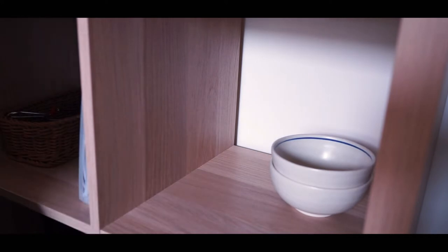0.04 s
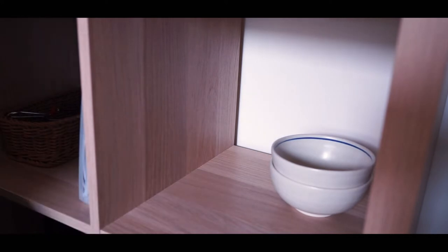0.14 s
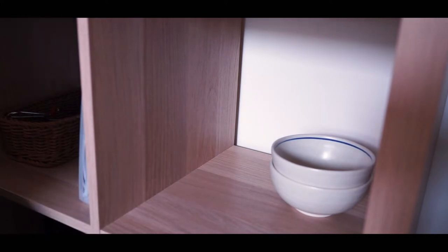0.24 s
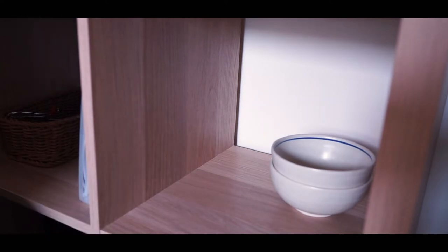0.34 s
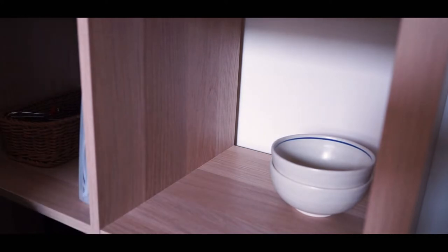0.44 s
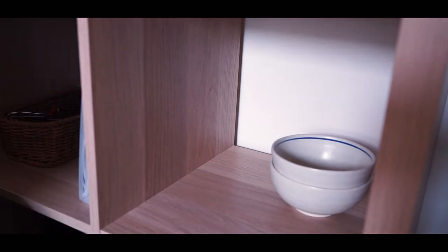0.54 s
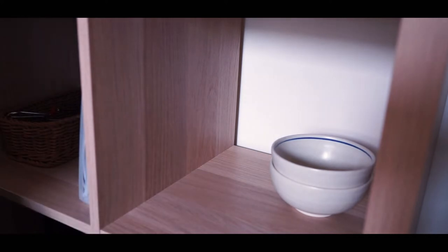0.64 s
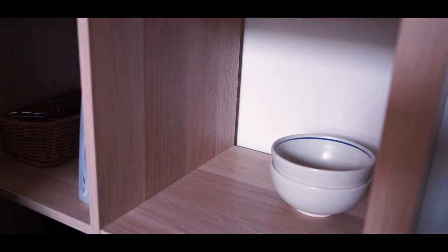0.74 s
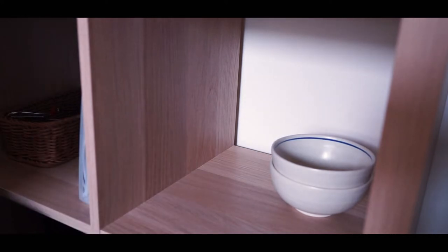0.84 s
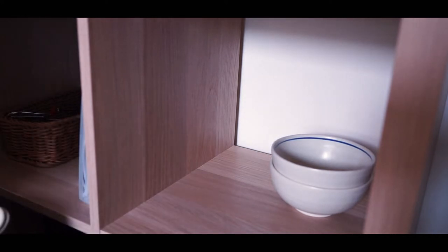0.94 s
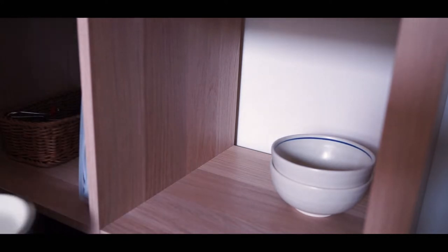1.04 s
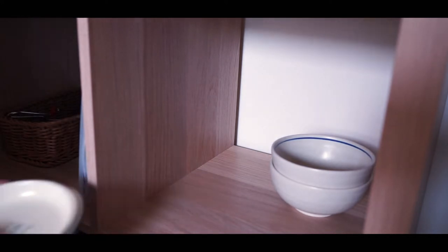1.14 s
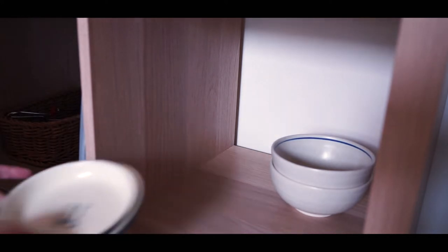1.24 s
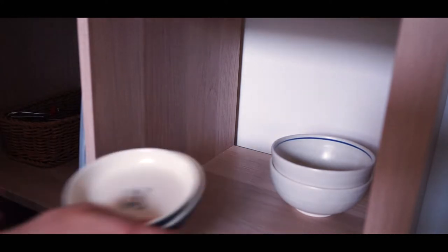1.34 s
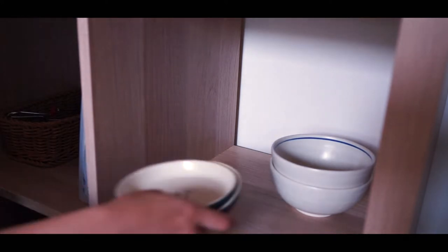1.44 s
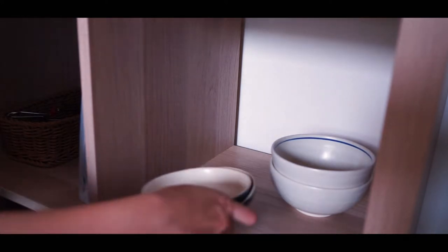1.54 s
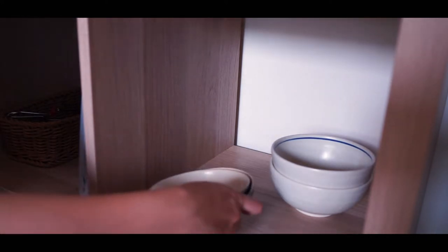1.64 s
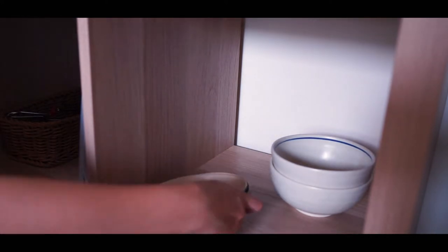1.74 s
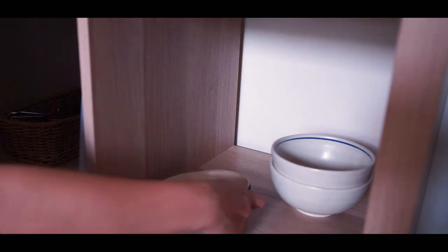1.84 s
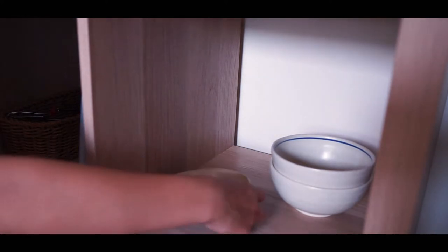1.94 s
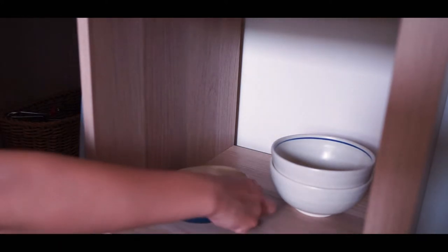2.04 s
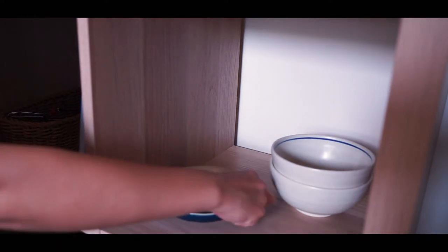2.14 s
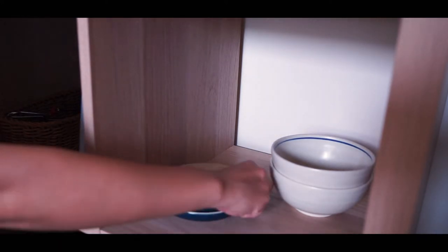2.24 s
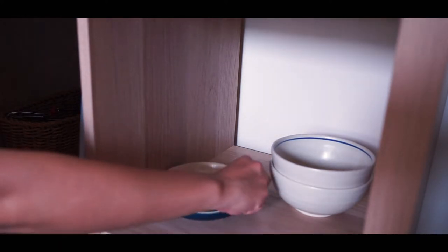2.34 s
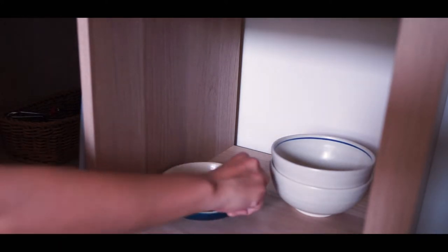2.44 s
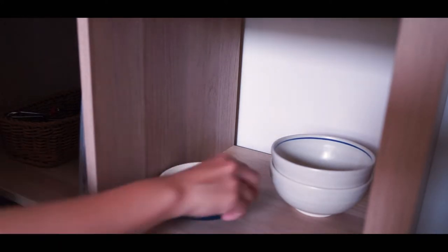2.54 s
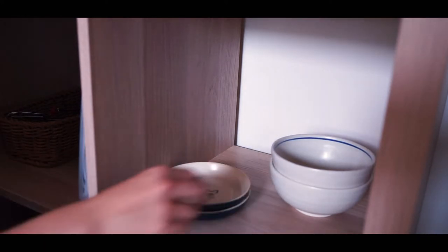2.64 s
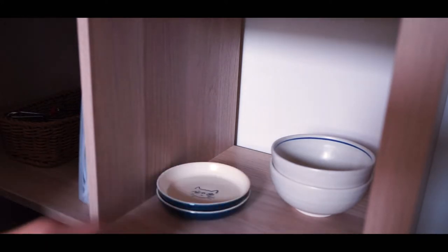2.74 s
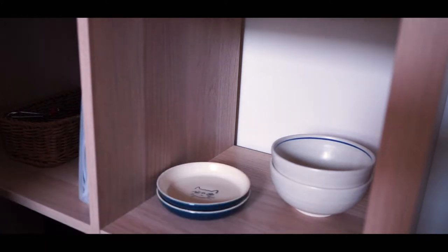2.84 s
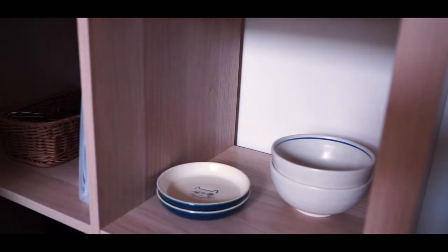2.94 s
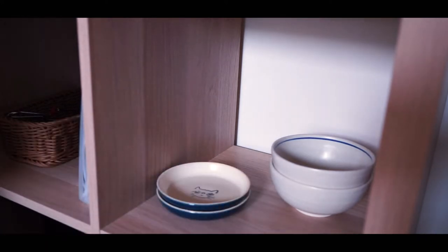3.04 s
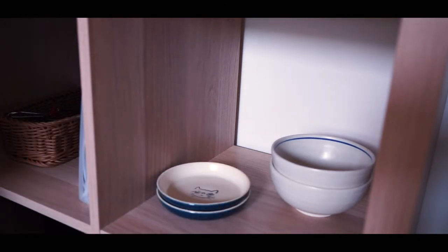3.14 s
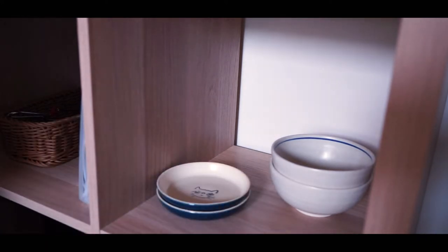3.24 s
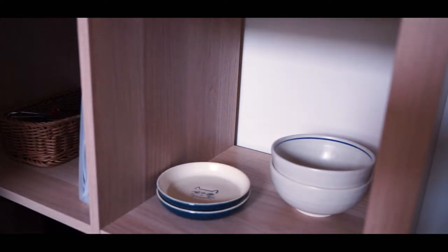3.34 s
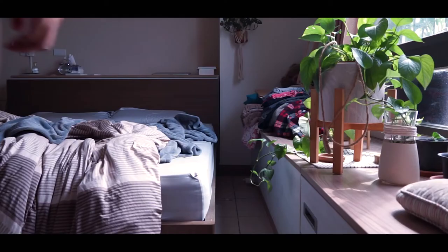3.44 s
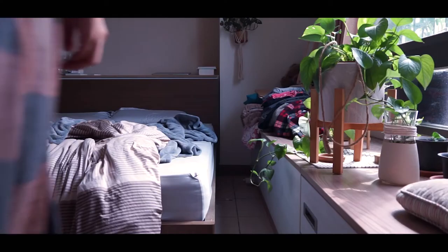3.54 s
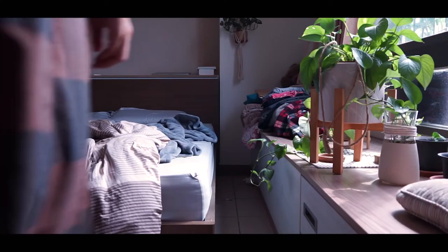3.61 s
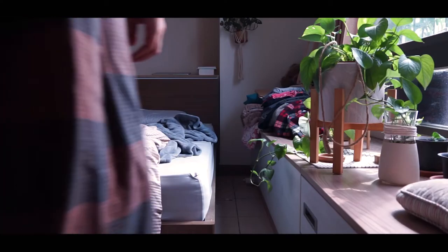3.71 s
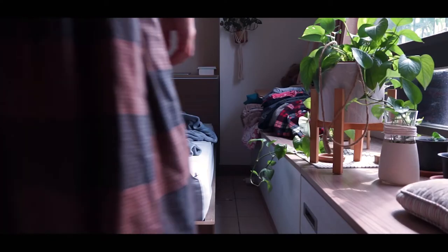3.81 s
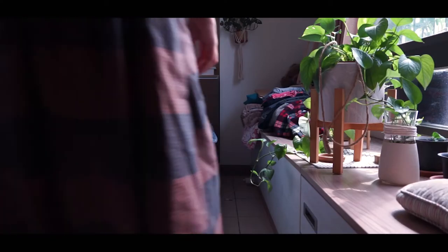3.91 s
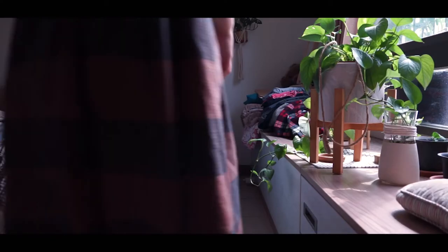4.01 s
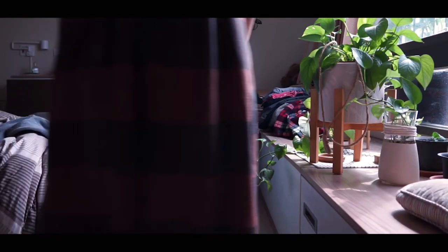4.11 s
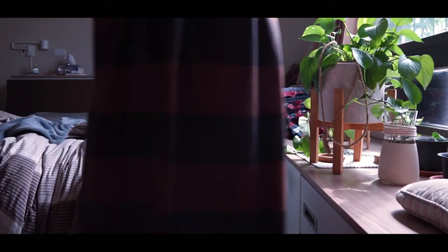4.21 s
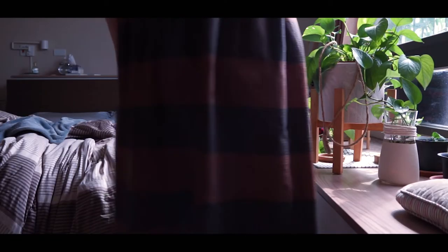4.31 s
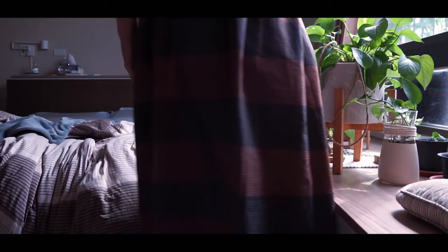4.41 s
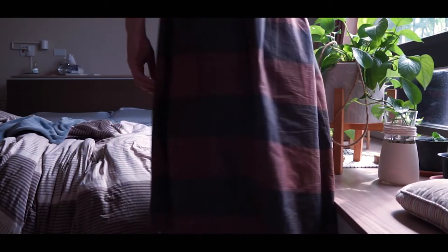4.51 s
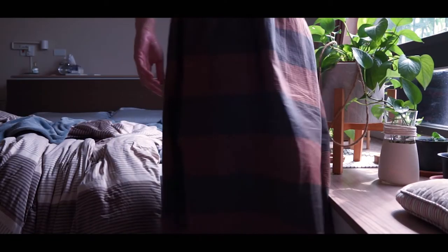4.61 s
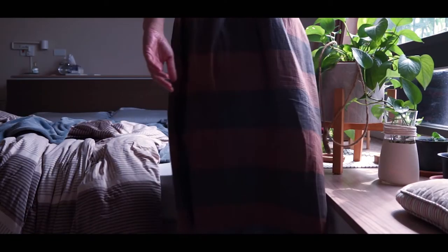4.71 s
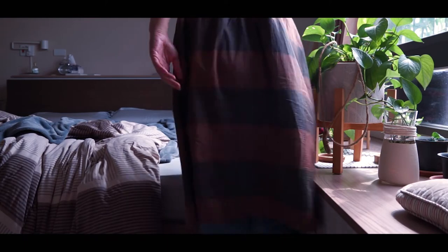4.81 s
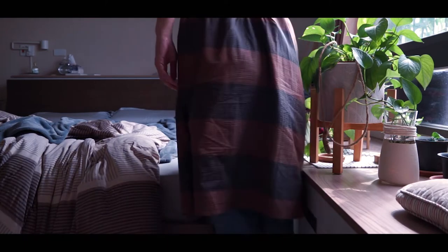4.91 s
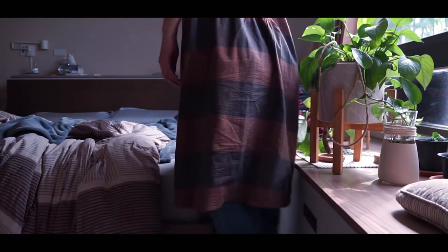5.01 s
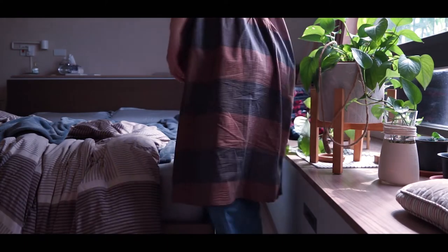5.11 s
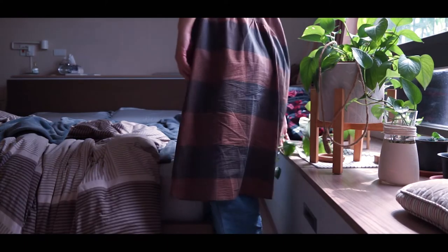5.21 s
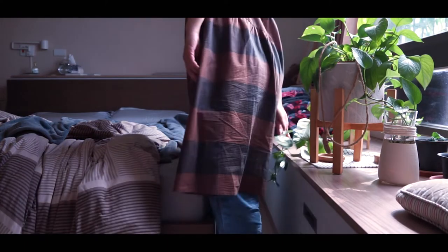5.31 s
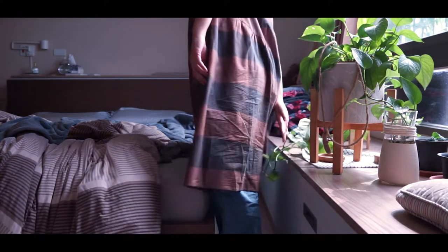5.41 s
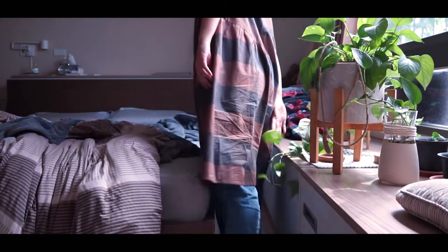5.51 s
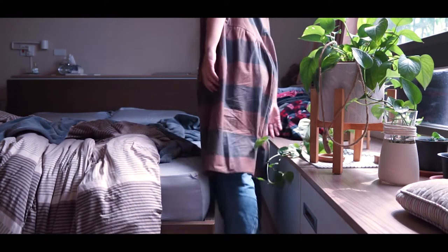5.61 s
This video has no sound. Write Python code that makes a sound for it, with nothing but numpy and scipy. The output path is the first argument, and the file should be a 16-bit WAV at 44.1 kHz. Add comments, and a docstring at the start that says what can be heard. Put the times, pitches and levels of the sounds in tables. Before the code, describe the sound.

In a quiet room, close to the microphone, stacked china plates scrape and knock against each other and on wood, ringing briefly. They land on a wooden shelf and rock flat in sharp, damped clacks, the loudest sounds here. The rest is much quieter: a short swish of fabric, a couple of soft footfalls and the light rustle of a dress, with a distant bird's falling whistles over a low hum of air.

```python
"""China clinks and scrapes: two small plates are slid and knocked off a wooden board to the left, carried
over and set down in a wooden shelf, where they rock and clack. Each blow rings the modes of plates and
wood; each slide is a stream of tiny slips. Then clothing swishes in strokes of noise as someone walks
through the quiet room, while a bird whistles far outside."""
import sys
import numpy as np
from scipy import signal
from scipy.fft import rfft, irfft, next_fast_len
from scipy.io import wavfile
from scipy.ndimage import uniform_filter1d, minimum_filter1d

SR = 44100
rng = np.random.default_rng(int(sys.argv[2]) if len(sys.argv) > 2 else 0)


def master_out(mix):
    """Clip the mix to full scale and print it as 16-bit PCM to the path in sys.argv[1]."""
    frames = np.transpose(np.atleast_2d(mix))
    ceiling = np.clip(frames, -1, 1)
    pcm = np.round(ceiling * 32767).astype(np.int16)
    wavfile.write(sys.argv[1], SR, pcm)


N = 249595
HIT_SIZE = 32768  # samples in one blow or room response
TIME, HIT_TIME = np.arange(N) / SR, np.arange(HIT_SIZE) / SR
HIT_HZ = np.fft.rfftfreq(HIT_SIZE, 1 / SR)


def amp(db):
    """Decibels to gain."""
    return 10 ** (np.asarray(db) / 20)


def unit_rms(x):
    """Scales to rms 1."""
    return x / np.sqrt(np.mean(x ** 2) + 1e-20)


def unit_energy(x):
    """Scales to an average energy of 1 per channel."""
    return unit_rms(x) / np.sqrt(x.shape[-1])


def curve_at(points, hz):
    """Reads a curve on a log-frequency axis."""
    point_hz, value = np.transpose(points)
    return np.interp(np.log(hz + 1), np.log(point_hz + 1), value)


def add(mix, start_s, sound):
    """Mixes a sound in at start_s."""
    part = mix[:, max(round(start_s * SR), 0):][:, :sound.shape[-1]]
    part += sound[..., :part.shape[-1]]


def strokes(table, attack_s, fade_db_per_s):
    """Envelope of rubbing strokes: each swells, holds and dies away."""
    start_s, length_s, level_db = np.transpose(table)[:, :, None]
    fade_db = np.clip(fade_db_per_s * (TIME - start_s - length_s), 0, 120)
    gains = np.clip((TIME - start_s) / attack_s, 0, 1) * amp(level_db - fade_db)
    return np.linalg.norm(gains, axis=0)


def flutter(depth_db, samples):
    """A gain that wavers at random, smoothed over so many samples."""
    return amp(depth_db * unit_rms(uniform_filter1d(rng.standard_normal(N), size=samples)))


# Left-right likeness of diffuse sound: freq_hz, correlation
STEREO_LIKENESS = [(60, 0.97), (290, 0.96), (640, 0.84), (1410, 0.69), (3100, 0.0033), (7000, 0.027)]
def noise(size, colour=((1, 0), (2, 0))):
    """Diffuse stereo noise, white by default: alike in the bass, unrelated in the treble."""
    n = next_fast_len(size)
    hz = np.fft.rfftfreq(n, 1 / SR)
    left, unrelated = rfft(rng.standard_normal((2, n)))
    likeness = curve_at(STEREO_LIKENESS, hz)
    right = likeness * left + np.sqrt(1 - likeness ** 2) * unrelated
    return unit_rms(irfft(np.array([left, right]) * amp(curve_at(colour, hz)), n)[:, :size])


def noise_band(hz, width_hz):
    """Noise that follows a pitch curve; a narrow band whistles."""
    pole = np.exp(-np.pi * width_hz / SR)
    band = signal.lfilter([1], np.poly([pole, pole]), noise(len(hz)) + 1j * noise(len(hz)))
    return unit_rms((band * np.exp(2j * np.pi * np.cumsum(hz) / SR)).real)


def click(colour):
    """The shortest click with this spectrum (minimum phase)."""
    cepstrum = irfft(np.log(amp(curve_at(colour, HIT_HZ))))
    cepstrum[1:HIT_SIZE // 2] *= 2
    cepstrum[HIT_SIZE // 2 + 1:] = 0
    return unit_energy(irfft(np.exp(rfft(cepstrum))))


def ring(modes, damping, split=0.0063):
    """One spectrum per mode, a beating pair as no plate is quite round; damping divides base_t60_s."""
    hz, energy_db, base_t60_s = np.transpose(modes)[:, :, None]
    phase = 2 * np.pi * hz * HIT_TIME
    twin = 0.45 * np.sin(phase * (1 + split) + 1) * (1 - np.exp(-phase / 20))
    waves = (np.sin(phase * (1 - split / 2)) - twin) * 1000 ** (-HIT_TIME * damping / base_t60_s)
    gains = amp(energy_db)
    waves *= gains / np.linalg.norm(waves, axis=1, keepdims=True) / np.linalg.norm(gains)
    delay_s = rng.uniform(0, 0.001937, hz.shape)  # bending waves need a moment to cross the plate
    return rfft(waves) * np.exp(-2j * np.pi * HIT_HZ * delay_s)


# Decay of the room tail: freq_hz, t60_s
ROOM_DECAY = [(150, 0.66), (400, 0.44), (1040, 0.47), (2760, 0.48), (7280, 0.41)]
# Tone of the room tail: freq_hz, level_db
ROOM_COLOUR = [(100, 11), (250, 6.5), (600, 4), (1200, 4), (3000, 0), (8000, 10), (16000, 10)]
def room(x, wet_db, near_db, near_t60_s):
    """Quick reflections between nearby panels, then the tail of a furnished room."""
    hz, t, bands = signal.stft(noise(HIT_SIZE, ROOM_COLOUR), SR, nperseg=256)
    decay = 1000 ** (-t / curve_at(ROOM_DECAY, hz)[:, None])
    tail = signal.istft(bands * decay, SR, nperseg=256)[1][:, :HIT_SIZE]
    tail = unit_energy(tail * np.clip((HIT_TIME - 0.004) / 0.0069, 0, 1))
    near = unit_energy(noise(HIT_SIZE) * 1000 ** (-HIT_TIME / near_t60_s) * (HIT_TIME > 0.002))
    return x + signal.fftconvolve(x, amp(wet_db) * tail + amp(near_db) * near, axes=1)[:, :N]


# Still air, before and after the change: freq_hz, density_db
EARLY_AIR = [(15, -48), (25, -28), (82, 0), (130, -11.5), (277, -1), (317, -9.5), (373, -4.5), (607, -8),
             (1040, -11), (1700, -13.5), (2280, -13), (2990, -18), (9840, -30.5), (10700, -28.5),
             (16000, -32.5)]
LATE_AIR = [(15, -61), (25, -32), (105, -3.5), (185, -11.5), (229, -2), (326, -13), (354, -12),
            (463, -10.5), (503, -11.5), (796, -13.5), (1940, -19), (2160, -19.5), (2410, -20.5),
            (3720, -24), (16000, -36.5)]
def room_tone(shelf_db=-50, window_db=-50.5, change_s=3.48, crossfade_s=0.014):
    """A low bed of air whose colour changes quickly at change_s."""
    blend = np.clip((TIME - change_s) / crossfade_s, 0, 1)
    return (np.sqrt(1 - blend) * amp(shelf_db) * noise(N, EARLY_AIR)
            + np.sqrt(blend) * amp(window_db) * noise(N, LATE_AIR))


# Calls: start_s, length_s, first_hz, last_hz, level_db, width_hz, bend (1 is straight, more flattens out)
BIRD_CALLS = [(2.425, 0.16, 3050, 2245, -50, 110, 1.8), (2.598, 0.2, 2274, 2250, -63, 81, 1.9),
              (2.971, 0.16, 2924, 2186, -52.5, 120, 1.77), (3.95, 0.29, 2173, 2180, -64.5, 30, 1.9),
              (4.435, 0.21, 3210, 1607, -53, 480, 1.4), (4.90, .12, 2650, 1700, -58, 380, 1.1),
              (5.16, 0.22, 3102, 1645, -54, 623, 0.99), (5.55, .12, 2516, 1660, -57, 450, 1.2)]
def bird():
    """Whistles, most of them falling, blurred by distance."""
    out = np.zeros((2, N))
    for start_s, length_s, first_hz, last_hz, level_db, width_hz, bend in BIRD_CALLS:
        progress = np.linspace(0, 1, round(length_s * SR))
        pitch_hz = last_hz + (first_hz - last_hz) * (1 - progress) ** bend
        add(out, start_s, amp(level_db) * np.sin(np.pi * progress) * noise_band(pitch_hz, width_hz))
    return room(out, wet_db=13, near_db=-27, near_t60_s=0.048)


# A close swish, and folds of a dress swinging with the strides: start_s, length_s, level_db
SWISH_STROKES = [(3.22, 0.257, -37), (3.265, 0.102, -37.5)]
RUSTLE_STROKES = [(3.50, .04, -57), (3.61, 0.067, -55.5), (4.19, 0.031, -55), (4.39, 0.14, -58.5),
                  (4.745, 0.17, -51), (4.98, 0.037, -55), (5.20, 0.13, -53), (5.47, 0.055, -54)]
# Tone of each: freq_hz, density_db
SWISH_COLOUR = [(120, -36), (200, -15), (259, -13), (366, -17), (409, -27), (491, -2.5), (709, -20),
                (1160, -4), (4430, -4), (8420, 0.5), (16000, -0.5)]
RUSTLE_COLOUR = [(300, -30), (1200, 0), (3000, -1), (5000, -0.5), (9000, -2), (16000, -6)]
# Soft arm brushes and bare steps: start_s, length_s, level_db, centre_hz, width_hz
BRUSHES_AND_STEPS = [(2.873, 0.15, -51, 2420, 2160), (3.134, 0.16, -50, 2490, 2200),
                     (3.326, 0.045, -48.5, 351, 202), (3.447, 0.035, -44, 290, 200),
                     (5.479, 0.12, -50, 2284, 1800)]
def walker(swish_left_db=0.5, rustle_db=-1):
    """Fabric rubs in grainy strokes of noise over a few soft brushes and footfalls."""
    swish = strokes(SWISH_STROKES, attack_s=0.052, fade_db_per_s=2500) * noise(N, SWISH_COLOUR)
    rustle = strokes(RUSTLE_STROKES, attack_s=0.036, fade_db_per_s=59) * noise(N, RUSTLE_COLOUR)
    out = swish * amp([[swish_left_db], [-swish_left_db]]) + amp(rustle_db) * rustle
    for start_s, length_s, level_db, centre_hz, width_hz in BRUSHES_AND_STEPS:
        swell = np.hanning(round(length_s * SR))
        add(out, start_s, amp(level_db) * swell * noise_band(np.full(len(swell), centre_hz), width_hz))
    return out * flutter(depth_db=1, samples=150)


# Swells of a high ring: start_s, length_s, level_db
SINGING_STROKES = [(1.045, 0.034, -48), (1.24, 0.16, -52.5)]
def singing(gain_db=-6, first_hz=10530, rise_hz_per_s=550):
    """A thin ring creeps upward while the plates are carried."""
    envelope = strokes(SINGING_STROKES, attack_s=0.03, fade_db_per_s=105)
    pitch_hz = first_hz + rise_hz_per_s * (TIME - SINGING_STROKES[0][0])
    return amp(gain_db) * envelope * noise_band(pitch_hz, width_hz=140)


# A sticking plate: start_s, length_s, level_db, pitch_hz
SQUEAKS = [(0.386, .06, -33.5, 1552)]
def squeak(width_hz=70):
    """The glaze catches, sings for a moment and lets go."""
    out = np.zeros((2, N))
    for start_s, length_s, level_db, pitch_hz in SQUEAKS:
        swell = np.sin(np.pi * np.sqrt(np.linspace(0, 1, round(length_s * SR))))
        add(out, start_s, amp(level_db) * swell * noise_band(np.full(len(swell), pitch_hz), width_hz))
    return room(out, wet_db=-7, near_db=-10, near_t60_s=0.03)


def slips(per_s, spread_db, max_db):
    """Stick-slip friction: random impulses, a few of them much stronger."""
    fired = rng.random(N) < per_s / SR
    return fired * amp(np.minimum(spread_db * rng.exponential(1, N), max_db))


# Pushes on the stack: start_s, length_s, glaze_db, wood_db
PUSHES = [(-0.03, .09, -47.5, -39.5), (.06, 0.054, -42, -50), (.345, 0.17, -42.5, -44),
          (.655, 0.039, -47, -53), (.682, 0.022, -44, -36), (.72, 0.068, -40.5, -53),
          (.897, .055, -46.5, -41), (1.025, 0.09, -56, -52), (1.31, 0.022, -58, -43),
          (1.65, 0.033, -55, -39.5)]
def push_envelope(on_wood):
    """How hard the pushes rub the wood, or else the glaze."""
    rows = np.array(PUSHES)[:, [0, 1, 3 if on_wood else 2]]
    return strokes(rows, attack_s=0.012, fade_db_per_s=233)


# Modes of the board: pitch_hz, energy_db, base_t60_s
BOARD_MODES = [(649, -9, 0.36), (672, -8, 0.36), (768, -10, 0.22), (809, -3, 0.24), (849, 0, 0.24),
               (942, -3, 0.26), (1034, -13, 0.37), (1061, -9, 0.36), (1148, -13, 0.27), (1280, -9, 0.24),
               (1318, -13, 0.25), (1462, -14, 0.23), (1493, -14, 0.27)]
# Its body, the crowded, quickly dying modes in between: freq_hz, density_db
BOARD_BODY = [(100, -63), (270, -31.5), (410, -2), (540, -2), (880, 10.5), (1500, -17), (3000, -9.5),
              (8000, -11), (16000, -14.5)]
def wood_drag(body_db=-4, ring_db=-4, band_hz=(280, 2800)):
    """The foot ring sticks and slips on the wood, which answers with a low rasp."""
    drive = unit_rms(slips(per_s=400, spread_db=3, max_db=9)) * push_envelope(on_wood=True)
    tones = irfft(ring(BOARD_MODES, damping=4.7).sum(0))
    response = amp(body_db) * click(BOARD_BODY) + amp(ring_db) * tones
    response = signal.sosfilt(signal.butter(3, band_hz, "bandpass", fs=SR, output="sos"), response)
    rasp = signal.fftconvolve(drive, response)[:N]
    return room(np.array([rasp, rasp]), wet_db=-9, near_db=-7.5, near_t60_s=0.031)


# Modes of plates pressed together: pitch_hz, energy_db, base_t60_s
RUBBED_MODES = [(853, -10, 0.16), (1630, -1, 0.02), (2088, 4.5, 0.036), (2548, -3.5, 0.052),
                (3940, 4, 0.039), (4410, -2, 0.044), (5740, 3, 0.0043), (6520, 1, 0.019), (7600, -7, 0.04),
                (9480, -3.5, 0.039), (11070, -6.5, 0.011), (13200, -30, 0.0047)]
# Hiss of glaze on glaze: freq_hz, density_db
GLAZE_HISS = [(250, -64), (450, -5), (850, 15), (1200, -55), (1600, -10), (2400, 13), (3000, 0.5),
              (4200, 0.5), (6600, -54.5), (8500, -3.5), (9800, -44), (12200, -59), (13700, 2), (16000, -63)]
def glaze_slide(gain_db=6, hiss_db=-5):
    """Tiny slips of rough foot rings on glaze come in clumps and keep the plates ringing."""
    grains = slips(per_s=1200, spread_db=2, max_db=8) * flutter(depth_db=2.5, samples=400)
    drive = unit_rms(grains * rng.choice([-1, 1], N)) * push_envelope(on_wood=False)
    response = amp(hiss_db) * click(GLAZE_HISS) + irfft(ring(RUBBED_MODES, damping=0.92).sum(0))
    scrape = amp(gain_db) * signal.fftconvolve(drive, response)[:N]
    stereo = np.array([scrape, np.roll(scrape, shift=4)])  # reaches the left ear first
    return room(stereo, wet_db=-9, near_db=-3, near_t60_s=0.04)


def resonator(modes, body, ring_db, damping, crack_db, clatter_db, clatter_t60_s, vary_db=2):
    """Returns a function giving the spectrum of one blow: crack, dense clatter and clear modes."""
    body_click = rfft(click(body))
    tones = amp(ring_db) * ring(modes, damping)
    fade = 1000 ** (-HIT_TIME[:HIT_SIZE // 4] / clatter_t60_s)

    def blow():
        weights = amp(vary_db * rng.standard_normal((2, len(modes))))  # each spot favours other modes
        clatter = rfft(unit_energy(noise(len(fade)) * fade), HIT_SIZE)
        return weights @ tones + body_click * (amp(crack_db) + amp(clatter_db) * clatter)
    return blow


def knocks(contacts, parts, lag_ms, low_cut_hz):
    """Each contact (start_s, one level_db per part, sharpness_hz) rings the parts; soft ones are dull."""
    out = np.zeros((2, N))
    right_lag = np.exp(-2j * np.pi * HIT_HZ * np.array([[0], [lag_ms]]) / 1000)
    for start_s, *levels_db, sharpness_hz in contacts:
        force = right_lag / (1 + 1j * HIT_HZ / sharpness_hz) ** 2
        blow = irfft(force * sum(amp(db) * part() for db, part in zip(levels_db, parts)))
        add(out, start_s, blow[:, :HIT_SIZE * 3 // 4] * np.sqrt(SR / 100))  # level as if packed in 10 ms
    # small panels radiate no bass
    return signal.sosfilt(signal.butter(8, low_cut_hz, "highpass", fs=SR, output="sos"), out)


# The stack bumps the board: start_s, board_db
BUMPS = [(.013, -26.5), (.058, -36), (.349, -19.5), (.395, -23.5), (.709, -21), (.737, -23), (.782, -25),
         (.932, -27), (1.121, -33), (1.3375, -28.5)]
# Plate strikes plate: start_s, upper_db, lower_db, board_db, sharpness_hz
CLINKS = [(.073, -35, -42, -27.5, 12500), (.099, -53, -34, -36, 5000), (0.1553, -9.5, -21, -19, 6840),
          (.280, -28, -50, -25.5, 14100), (.303, -24.5, -38, -24.5, 1460), (.4235, -48, -31.5, -25, 5070),
          (0.522, -43, -41, -62, 18360), (.748, -27, -39, -27, 4000), (.798, -17.5, -15, -8.5, 4640),
          (1.048, -57, -60, -34.5, 9000), (1.328, -51, -51, -34, 7100)]
def loose_contacts(bump_hz=1920, jolt_db=-20, kick_s=0.009, chatter_s=0.047, chatter_hz=1800):
    """Bumps shake both plates softly; a hard clink kicks the lower one and the upper chatters on it."""
    rows = [(start_s, db - 12, db - 15.5, db, bump_hz) for start_s, db in BUMPS] + list(CLINKS)
    for start_s, upper_db, _, board_db, sharpness_hz in CLINKS:
        if upper_db > jolt_db:
            rows.append((start_s + kick_s, -np.inf, upper_db - 9, board_db - 9.5, sharpness_hz))
            for bounce, drop_db in enumerate([11, 15.5, 20], start=1):
                db = upper_db - drop_db
                rows.append((start_s + bounce * chatter_s, db, db - 4, board_db - drop_db - 4, chatter_hz))
    return rows


# Modes of the loose plates: pitch_hz, energy_db, base_t60_s
UPPER_LOOSE_MODES = [(912, -7, 0.42), (996, 0, 0.42), (1087, -9, 0.28), (1174, -15, 0.3), (1277, -11, 0.27),
                     (1357, -11, 0.25), (1490, -16, 0.22), (1988, -2, 0.2), (2043, -6, 0.21),
                     (2254, -11, 0.26), (2366, -1, 0.24), (2445, 0, 0.25), (3938, -18, 0.31),
                     (4210, -13, 0.28), (4626, -20, 0.32), (6472, -16, 0.3), (7436, -18, 0.24),
                     (9627, -18, 0.42), (12720, -26, 0.4), (13560, -23, 0.35)]
LOWER_LOOSE_MODES = [(2064, -12, 0.26), (2137, -4, 0.26), (2231, -7, 0.27), (2439, 0, 0.21),
                     (2514, -17, 0.22), (3274, -16, 0.19), (4206, -16, 0.2), (4456, -22, 0.34),
                     (6390, -16, 0.37), (7432, -20, 0.29), (9650, -25, 0.25)]
# Their body: freq_hz, density_db
LOOSE_BODY = [(150, -47), (400, -17.5), (1000, 9.5), (1600, 1), (2400, 12.5), (2900, -11), (4200, 3),
              (5300, -5.5), (7400, -2.5), (8500, -28), (10000, 1), (16000, -43)]
def pick_up():
    """The loose plates knock each other and the board, off to the left."""
    upper = resonator(UPPER_LOOSE_MODES, LOOSE_BODY, ring_db=-2, damping=1.2,
                      crack_db=-13, clatter_db=-4, clatter_t60_s=0.06)
    lower = resonator(LOWER_LOOSE_MODES, LOOSE_BODY, ring_db=-1, damping=1.2,
                      crack_db=-13, clatter_db=-4, clatter_t60_s=0.07)
    board = resonator(BOARD_MODES, BOARD_BODY, ring_db=-10.5, damping=1.7,
                      crack_db=-7, clatter_db=-6, clatter_t60_s=0.057)
    clinks = knocks(loose_contacts(), [upper, lower, board], lag_ms=0.1, low_cut_hz=294)
    return room(clinks, wet_db=-2, near_db=-7.5, near_t60_s=0.033)


# The stack meets the shelf: start_s, shelf_db, lower_db, sharpness_hz, hop_s, clack_db
LANDINGS = [(1.6076, -30.5, -37, 3460, 0.055, -49), (1.795, -11, -0.5, 13200, 0.0024, -7),
            (2.037, -30, -26.5, 6000, 0.0067, -35), (2.0536, -13, -18, 4580, .0065, -24),
            (2.0897, -25, -26.5, 4500, 0.0049, -47), (2.171, -2, -10.5, 2950, 0.013, -9.5),
            (2.178, -16.5, -11.5, 2370, .028, -24.5)]
def seated_contacts(clack_hz=9700, rebound_db=-21):
    """At each landing the upper plate hops, clacks back and rebounds once."""
    rows = []
    for start_s, shelf_db, lower_db, sharpness_hz, hop_s, clack_db in LANDINGS:
        rows.append((start_s, lower_db - 15.5, lower_db, shelf_db, sharpness_hz))
        for delay_s, db in [(hop_s, clack_db), (2.5 * hop_s, clack_db + rebound_db)]:
            rows.append((start_s + delay_s, db, db - 21, db - 10, clack_hz))
    return rows


# Modes of the seated plates and the shelf: pitch_hz, energy_db, base_t60_s
UPPER_SEATED_MODES = [(1864, -4, 0.18), (1962, -5, 0.19), (2243, -12, 0.26), (2308, -10, 0.26),
                      (2498, -11, 0.31), (3252, 0, 0.16), (3834, -14, 0.22), (4023, -15, 0.28),
                      (4260, -9, 0.24), (5539, -10, 0.25), (5657, -9, 0.22), (5770, -9, 0.2),
                      (5889, -10, 0.19), (6428, -17, 0.25), (6565, -17, 0.24), (7405, -17, 0.26),
                      (8099, -18, 0.23), (9222, -14, 0.42), (10700, -14, 0.42), (13700, -16, 0.3)]
LOWER_SEATED_MODES = [(221, -8, 0.42), (244, -13, 0.42), (268, -13, 0.42), (315, -8, 0.42), (758, -5, 0.42),
                      (793, -3, 0.42), (895, -4, 0.42), (945, 0, 0.42), (977, -5, 0.42), (1000, -7, 0.42),
                      (1330, -5, 0.42), (1929, -5, 0.33), (2059, -5, 0.3), (2257, -10, 0.42),
                      (2428, -12, 0.42), (3164, -5, 0.42), (3895, -12, 0.36), (3962, -8, 0.36),
                      (4230, -3, 0.3), (4546, -9, 0.32), (4694, -9, 0.37), (4897, -16, 0.42),
                      (5382, -12, 0.35), (5498, -7, 0.35), (5607, -12, 0.34), (6377, -12, 0.42),
                      (6519, -12, 0.42), (9080, -8, 0.33), (9181, -12, 0.33), (11220, -11, 0.42),
                      (13630, -11, 0.26)]
SHELF_MODES = [(221, -12, 0.42), (252, -15, 0.42), (306, -8, 0.23), (369, -17, 0.42), (455, -15, 0.42),
               (497, -9, 0.34), (581, 0, 0.19), (631, 0, 0.2), (678, -5, 0.23), (732, -2, 0.26),
               (803, 0, 0.25), (837, -4, 0.24), (903, -4, 0.21), (956, 0, 0.18), (989, -12, 0.2),
               (1074, -13, 0.33), (1124, -9, 0.35), (1147, -5, 0.32), (1188, -5, 0.28), (1215, -10, 0.28),
               (1281, -8, 0.36), (1319, -11, 0.42), (1359, -12, 0.42), (1400, -10, 0.31), (1443, -6, 0.24),
               (1548, -13, 0.32)]
# Their bodies: freq_hz, density_db
SEATED_BODY = [(150, -28), (400, -8), (900, 12.5), (1600, -2), (2700, 3.5), (4300, 2.5), (5100, -5),
               (6500, -5), (8600, -12.5), (10500, -8.5), (14000, -18), (16000, -74)]
SHELF_BODY = [(70, -40), (150, -2), (220, -4), (300, -5), (420, -23), (510, 6), (570, 8), (660, -1),
              (780, 11.5), (950, -1), (1400, 4), (2500, -9.5), (5000, -40), (16000, -16)]
def set_down():
    """The stack lands on the shelf, tips and drops flat in short, damped clacks."""
    upper = resonator(UPPER_SEATED_MODES, SEATED_BODY, ring_db=-4.5, damping=3.2,
                      crack_db=-32, clatter_db=-2.5, clatter_t60_s=0.029)
    lower = resonator(LOWER_SEATED_MODES, SEATED_BODY, ring_db=-7, damping=2.44,
                      crack_db=-42, clatter_db=-5.5, clatter_t60_s=0.043)
    shelf = resonator(SHELF_MODES, SHELF_BODY, ring_db=-9, damping=1.63,
                      crack_db=-9.5, clatter_db=-8.5, clatter_t60_s=0.23)
    clacks = knocks(seated_contacts(), [upper, lower, shelf], lag_ms=0.012, low_cut_hz=201)
    return room(clacks, wet_db=-2.5, near_db=-9, near_t60_s=0.037)


def scene(left_db=0.65):
    """All sources, a little stronger on the left."""
    plates = pick_up() + set_down() + glaze_slide() + singing() + wood_drag() + squeak()
    return (plates + bird() + walker() + room_tone()) * amp([[left_db], [-left_db]])


def record(dry, limit_db=-2.5, recover_db_per_s=180, high_cut_hz=15950):
    """A fast look-ahead limiter holds the loudest clacks down; a steep low-pass trims the top."""
    peak_db = 20 * np.log10(abs(dry).max(0) + 1e-9)
    recovery_db = TIME * recover_db_per_s
    held_db = np.maximum.accumulate(peak_db + recovery_db) - recovery_db
    over_db = np.maximum(held_db - limit_db, 0)
    gain_db = uniform_filter1d(minimum_filter1d(-over_db, size=120), size=120)
    low_pass = signal.firwin(511, high_cut_hz, window=("kaiser", 9), fs=SR)
    return signal.oaconvolve(dry * amp(gain_db), low_pass[None], "same")


dry = scene()
out = record(dry)
master_out(out)
```